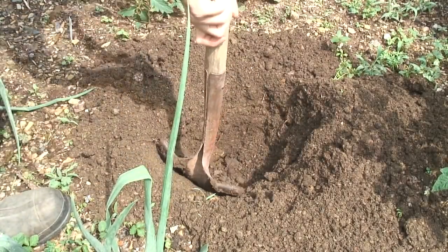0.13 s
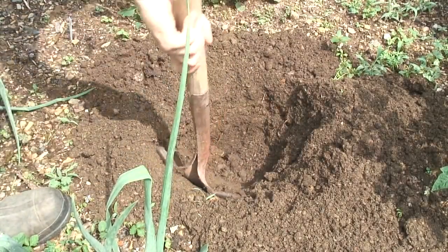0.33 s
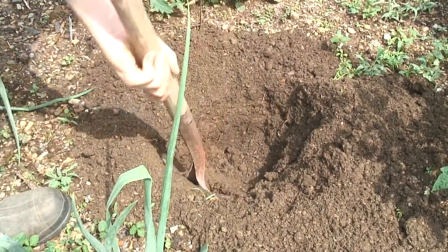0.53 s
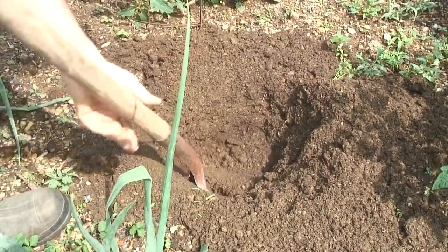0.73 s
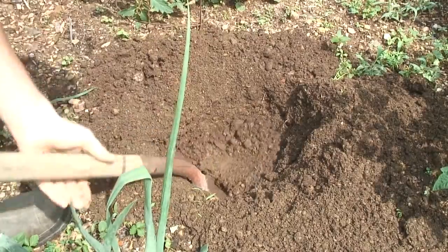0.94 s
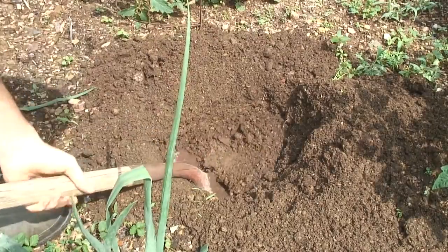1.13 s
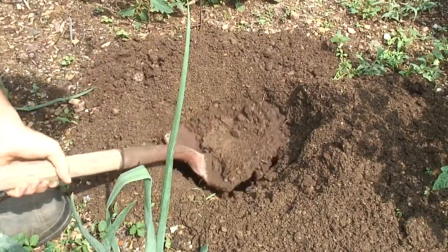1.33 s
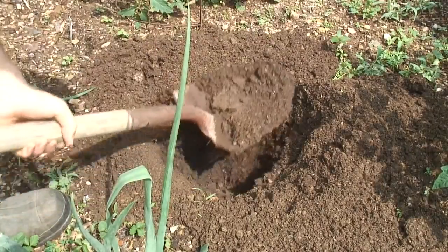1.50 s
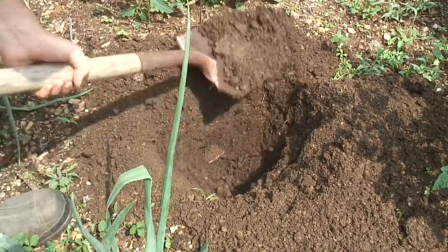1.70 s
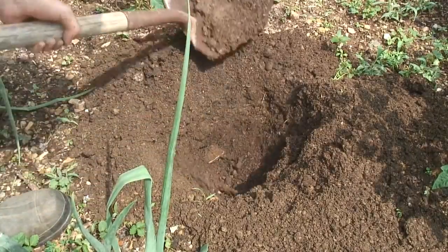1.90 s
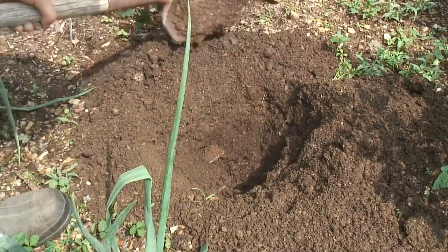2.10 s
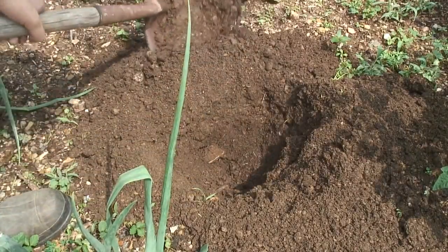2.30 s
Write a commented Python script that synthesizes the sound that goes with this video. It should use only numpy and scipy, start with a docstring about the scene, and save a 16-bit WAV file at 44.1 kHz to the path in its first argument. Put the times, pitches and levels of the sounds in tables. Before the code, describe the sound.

Gritty scraping of a steel shovel pushed through garden earth with stone knocks, then faint birdsong

```python
"""A steel shovel blade is levered through loose, stony garden soil close by, from the very start.
Slipping grains ring the damped blade in stutters, and stones knock it with short taps.
At 0.83 s a low thump comes through the ground; from 0.95 s crumbs trickle off the lifted blade.
From 1.07 s a far bird whistles in wavering gliding tones with an echo.
Under it all lie garden air, made of filtered noise, and the wandering low tones of a far machine."""
import sys
import numpy as np
from scipy import signal
from scipy.fft import rfft, irfft
from scipy.io import wavfile
from scipy.ndimage import uniform_filter1d

SR = 44100
rng = np.random.default_rng(int(sys.argv[2]) if len(sys.argv) > 2 else 0)


def linear_from_db(decibels):
    """Turn decibels (scalar or array-like) into linear amplitude factors; 0 gives 1."""
    return 10 ** (np.asarray(decibels, float) / 20)


def wav_record(signal):
    """Record a signal, one row per channel, as 16-bit PCM in the file named by sys.argv[1]."""
    frames = np.transpose(np.atleast_2d(signal))
    bounded = np.clip(frames, -1, 1)
    # unit amplitude maps onto the largest positive 16-bit level
    quanta = np.round(bounded * 32767).astype(np.int16)
    wavfile.write(sys.argv[1], SR, quanta)


N = 103635  # length in samples


def evened(x):
    """Scales to rms 1."""
    return x / np.sqrt(np.mean(x ** 2) + 1e-20)


def smooth_noise(width):
    """Slowly wandering noise of rms 1: white noise averaged twice over width samples."""
    noise = rng.standard_normal(N)
    return evened(uniform_filter1d(uniform_filter1d(noise, width), width))


def read(points, hz):
    """Reads a spectrum table on a log-frequency axis."""
    f, value = np.transpose(points)
    return np.interp(np.log(hz + 1), np.log(f + 1), value)


def colour(x, points):
    """Filters x to the given spectrum with a causal, minimum-phase filter."""
    gain_db = read(points, abs(np.fft.fftfreq(4096, 1 / SR)))
    log_gain = np.log(linear_from_db(np.maximum(gain_db, -100)))
    taps = np.fft.ifft(np.exp(np.conj(signal.hilbert(log_gain)))).real[:2048]
    return signal.oaconvolve(x, taps)[:len(x)]


def band_filter(x, order, hz, kind):
    """Butterworth filter: low, high or band."""
    return signal.sosfilt(signal.butter(order, hz, kind, fs=SR, output="sos"), x)


def slips(per_s, spread_db, clump_db):
    """Grains that slip: random clicks of either sign, a few large, bunched over some milliseconds."""
    size = linear_from_db(spread_db * np.minimum(rng.exponential(1, N), 4))
    size = size * (rng.random(N) < per_s / SR)
    clumps = smooth_noise(200)
    return evened(size * rng.choice([-1., 1.], N) * linear_from_db(clump_db * clumps))


# The ringing tones of blade and shaft, damped by soil.
# Each row: frequency in Hz, width in Hz (wider dies sooner), relative level in dB.
BLADE_MODES = [(195, 79, -3.5), (314.5, 54, -3.5), (405, 118, -4), (533, 180, -4.5), (610, 84, -5),
               (720, 224, 2.5), (1054, 70, -16.5), (1152, 39, -21), (1588, 52, 3.5), (1696, 166, 8),
               (1996, 206, 10), (2200, 50, -26), (3030, 135, -4), (3237, 150, 6), (3890, 230, 8.5),
               (4790, 174, 1), (5170, 158, -9.5), (5880, 200, -11.5), (6740, 870, 3), (7820, 1100, -1)]


def ring(x, lo, hi):
    """Strikes the modes between lo and hi Hz: decaying sines, scaled together to unit energy."""
    t = np.arange(2000) / SR
    taps = np.zeros(len(t))
    for hz, width, db in BLADE_MODES:
        if lo < hz < hi:
            taps += linear_from_db(db) * np.exp(-np.pi * width * t) * np.sin(2 * np.pi * hz * t)
    return signal.oaconvolve(x, taps / np.linalg.norm(taps))[:len(x)]


# The tone of gritty crunch that does not ring. Each row: frequency in Hz, relative level in dB.
GRIT_TONE = [(120, -28), (200, -7.5), (575, 5.5), (974, -37), (1170, -6), (1330, 2), (3180, -1.5),
             (8820, -15), (10800, -22), (15500, -60.5)]


def crunch(x):
    """Colours clicks as grit; the filter is scaled to unit energy."""
    single_click = np.eye(1, 2048)[0]
    return colour(x, GRIT_TONE) / np.linalg.norm(colour(single_click, GRIT_TONE))


# The blade dragging through soil, written as several lists of rows that join into one curve. # Each row: time
# in seconds, push in dB, then levels in dB relative to that push: # soil thud, shaft, low blade tones, grit
# hiss.
DRAG_SPANS = [
    [(0.0, -60.5, 25.5, -3, 13, 10.5), (0.028, -59, 17, 1, 8, 13.5), (0.036, -44.5, 13, -16, -1, 2),
     (0.046, -59, 21, 5, 4, 13), (0.052, -44, 10.5, -13, -4, 2.5), (0.072, -52, 17, 14, 2, 7),
     (0.08, -43, 5, 6, 8.5, 1), (0.104, -45.5, 10, 1, 2, 2.5), (0.152, -58.5, 12, 7, -2, 1),
     (0.176, -46, -3, -9, 3.5, 1.5), (0.202, -55.5, 17, 4, 5, 7.5), (0.22, -58.5, 14, 7, -5, 12)],
    [(0.222, -46.5, 13, 11.6, 15.3, 0), (0.25, -41, 1, 12, 8.1, -0.5), (0.268, -37.5, 10, 10.6, 1, -4),
     (0.272, -43, 17.5, 11, 8, 4.5), (0.298, -33.5, -2.5, 8.2, 3, -1), (0.31, -36.5, 10, 7.4, 13, 3)],
    [(0.312, -29, 0, 8, 8.5, 0), (0.316, -32, -4, 3.5, 5, 1.5), (0.346, -26.5, -14, 4, 10.5, -0.5),
     (0.368, -39, -17, -7, 6, 7.5), (0.38, -43, -26, -9, -25, 8.5), (0.4, -36.5, -12, -12, -9, 4.5),
     (0.412, -32, -7, -4, -5, 2.5)],
    [(0.414, -32.5, -6, -8, 0.5, -0.5), (0.438, -33, -1, -1.5, 5, 6), (0.47, -27, -16, -8.5, -9.5, -3),
     (0.504, -39, -20, -20, -23, 2.5), (0.524, -40.5, -8, -13, -14, -3), (0.53, -30, -12, -15, -17, 0)],
    [(0.532, -34, -2, -15, -23, -3), (0.542, -23, -17, -17, -35, -23), (0.55, -38, -14, -25, -16, 4),
     (0.56, -33, 2, -1, -21, -2.5), (0.574, -28.5, -10, -6, -12, -7), (0.588, -41.5, -6, -2, -9, 7),
     (0.598, -36.5, -14, -21, -23, -5), (0.61, -36.5, -15, -3.5, -19, 3.5), (0.658, -36, 8, -6, -20, 6),
     (0.664, -26.5, -9, -6, -12, -7), (0.684, -53.5, 0, -7, -8.5, 8.5), (0.7, -48, -1, 2, -12, 2)],
    [(.705, -50, 15, -3, -6, 5), (.731, -53, -1, -4, 3, 3), (.733, -18.5, -14, -14, -20, -11),
     (.737, -41, 14, -7, -15, -2), (.748, -53, 14, 9, -10, 6), (.752, -31, 9.5, -4, -26, -0.5),
     (.772, -42, 4, -14, -22, 1.5), (.776, -51, 10, -2, -9, 6), (.797, -51, 11, 3, -13, -0.5)],
    [(.799, -42, 5, -1, -10, -8), (.804, -44, 13, -5, -9, -16), (.807, -44, 8, -11, 0, -3),
     (.809, -25.5, -12, -1.5, -13, 0), (.816, -29, -17, -10, -18, -2), (.820, -31, 9, -4, -10, -2),
     (.823, -16.5, -4, -11, -10, -11), (.830, -10.5, 0.5, -8, -22, -7), (.843, -11, -38, -30, -16, -4),
     (.845, -30, 2, -3, -21, -16), (.848, -17, -15, -14, -20, -3), (.855, -10, -10, -26, -21, -16.5),
     (.857, -26.5, -4, 14, -18, -12), (.862, -26.5, -2, 2, -12, -9), (.864, -6.5, -11.5, -21, -10, -14),
     (.874, -12, -19, -30, -37, -25), (.876, -19, 0, -2.5, -25, -5), (.889, -25.5, -8, 5.5, -27, -2.5),
     (.893, -40, 6, -6, -6, -6.5), (.95, -51, -8, -2, -5, 1)],
]


def drag():
    """Coarse grains slip on the steel and ring its modes; fine grit hisses on top."""
    rows = np.concatenate(DRAG_SPANS)
    t = np.arange(N) / SR
    level, thud, shaft, low, hiss = (np.interp(t, rows[:, 0], column) for column in rows.T[1:])
    push = linear_from_db(level) * (np.arange(N) < rows[-1, 0] * SR)
    force = slips(per_s=1800, spread_db=4.5, clump_db=2.0) * push
    grit = slips(per_s=6300, spread_db=3, clump_db=1.9) * push
    fine = (grit + .5 * force) * linear_from_db(hiss)

    out = ring(force * linear_from_db(thud), 0, 480)
    out += ring(force * linear_from_db(shaft), 480, 800)
    out += ring(force * linear_from_db(low), 800, 1300)
    out += ring(force, 1300, 2700)
    out += linear_from_db(-3) * ring(fine, 2700, SR)
    out += linear_from_db(4) * band_filter(crunch(force), 2, [1200, 2800], "band")
    out += linear_from_db(2.5) * band_filter(crunch(fine), 2, 4200, "high")
    return out


# Stones knocking the blade.
# Each row: start in seconds, strength in dB, dB added to that for the thud; gains follow below.
STONE_KNOCKS = [(0.0347, -28.5, -8), (0.0521, -34.5, 1), (0.1086, -15.5, -11.5), (0.1278, -30, -1),
                (0.171, -24.5, 0.5), (0.1889, -19.5, -3.5), (0.2193, -28, 2), (0.2283, -25.5, 6.5),
                (0.2458, -16, 3), (0.2739, -16, -11), (0.419, -11.5, -25), (0.4704, -12, -32),
                (0.5397, -14.5, -26), (0.5742, -13.5, -16.5), (0.6604, -9.5, -18.5), (0.7334, -18, -15),
                (0.7535, -20, -2.5), (0.7694, -29.5, 5.5), (0.8019, -6, -9), (0.829, -5.5, -19.5),
                (0.8359, 0.5, -13), (0.8487, -4, -17), (0.8634, -3, -18.5), (1.9829, -34, -14),
                (2.3096, -34, -12.5)]


def knocks():
    """Each stone is a short noise burst that cracks and rings the blade, with a dull thud."""
    hit, thud = np.zeros(N + 300), np.zeros(N + 300)
    fade = np.exp(-np.arange(200) / SR / 0.0011)  # falls to 1/e in 1.1 ms
    for start, db, thud_db in STONE_KNOCKS:
        tap = rng.standard_normal(200) * fade
        at = round(start * SR)
        hit[at:at + 200] += linear_from_db(db + 5.5) * tap / np.linalg.norm(tap)
        thud[at:at + 60] += linear_from_db(db + thud_db) * np.hanning(60)
    blade = linear_from_db(-3) * ring(hit, 800, SR)
    crack = linear_from_db(-2) * crunch(hit)
    dull = linear_from_db(-6.5) * ring(thud, 0, 800)
    return (blade + crack + dull)[:N]


# Crumbs sliding off the lifted blade; gains follow below.
# Each row: time in seconds, trickle level in dB, clods in dB relative to the trickle.
TRICKLE_LEVEL = [(.95, -52, 3.5), (1.0, -48.5, 2), (1.065, -48, -1), (1.081, -40.5, 3.5), (1.124, -43, 5),
                 (1.14, -55, 5), (1.16, -63, 2), (1.3, -64, 6), (1.42, -53.5, -2), (1.52, -53, 3),
                 (1.59, -48.5, -1), (1.66, -54, -1), (1.76, -66, 4), (1.98, -61, -2), (1.981, -48, 2),
                 (1.987, -59, 4), (1.992, -63, 0.5), (2.21, -69, 3), (2.25, -60, 1.5), (2.295, -55, 3.5),
                 (2.308, -46.5, 1), (2.322, -54.5, 0.5), (2.35, -58, 0)]
# The tone of falling crumbs. Each row: frequency in Hz, relative level in dB.
CRUMB_TONE = [(180, -29), (300, -11), (1230, -8), (1540, -2.5), (1850, -2.5), (2320, 7.5), (3490, -6.5),
              (6840, -16), (13600, -32), (15000, -50)]


def trickle():
    """Random clicks patter off the blade: fine crumbs above 3000 Hz, clods below."""
    s, db, clod_db = np.transpose(TRICKLE_LEVEL)
    t = np.arange(N) / SR
    crumbs = colour(slips(per_s=6000, spread_db=2.8, clump_db=0.59), CRUMB_TONE)
    fine = evened(band_filter(crumbs, 2, 3000, "high"))
    clods = evened(band_filter(crumbs, 2, 3000, "low"))
    clods *= linear_from_db(np.interp(t, s, clod_db))
    level = linear_from_db(np.interp(t, s, db, left=-120))  # practically silent before the lift
    return level * (1.84 * fine + 1.54 * clods)


def shovel():
    """All that the blade does; it is too small to radiate bass."""
    return band_filter(drag() + knocks() + trickle(), 4, [227, 13400], "band")


# How far the two sides differ. Each row: frequency in Hz, side level minus mid level in dB.
SHOVEL_SIDE = [(100, -23), (300, -16.5), (700, -21.5), (1400, -25.5), (2400, -22.5), (3500, -8), (5000, -4),
               (8000, -4.5), (12000, 0.5)]


def ports(x, other):
    """Two close microphone ports: alike in the bass; in the treble phase and grains differ."""
    shifted_share = .55  # power share of the side that is the same sound, a quarter cycle shifted
    side = 1j * np.sqrt(shifted_share) * rfft(x) + np.sqrt(1 - shifted_share) * rfft(other)
    side = irfft(side * linear_from_db(read(SHOVEL_SIDE, np.fft.rfftfreq(N, 1 / SR))), N)
    return np.array([x + side, x - side])


def thump():
    """The ground jolts as a buried stone gives way: one decaying low sine, stronger on the left."""
    start_s, level_db, hz, t60_s = .834, -21.46, 59.7, 0.11
    t = np.maximum(np.arange(N) / SR - start_s, 0)
    port_db = np.array([[2.5], [-2.5]])  # left, right
    return linear_from_db(level_db + port_db - 60 * t / t60_s) * np.sin(2 * np.pi * hz * t)


# The bird's notes, one list of rows for each gliding whistle.
# Each row: time in seconds, pitch in Hz, level in dB before the flutter and gain below.
BIRD_NOTES = [
    [(1.07, 2950, -49), (1.11, 2834, -48), (1.14, 3100, -55), (1.15, 2900, -52), (1.19, 2770, -65)],
    [(1.15, 2640, -48), (1.17, 2280, -52), (1.19, 2200, -61)],
    [(1.2, 2900, -52), (1.25, 2635, -48.5), (1.3, 2510, -65), (1.34, 2600, -60)],
    [(1.41, 4770, -56), (1.43, 4970, -59)],
    [(1.63, 2378, -53), (1.66, 2300, -57), (1.68, 3100, -48.5), (1.7, 3450, -55), (1.72, 3493, -48),
     (1.726, 2876, -46), (1.733, 2403, -55), (1.76, 2293, -57), (1.8, 2135, -57)],
    [(1.73, 3450, -64), (1.8, 3400, -65), (1.9, 3450, -63), (1.97, 3450, -72)],
    [(1.82, 2234, -53), (1.87, 2315, -56), (1.89, 2116, -48), (1.91, 2100, -65)],
    [(1.85, 2830, -58), (1.9, 3050, -56), (1.94, 2825, -54)],
]


def bird():
    """Gliding sines with wavering pitch and fluttering level, echoing off the garden walls."""
    flutter_db, echo_db, echo_t60_s = 2.5, 0.5, 0.84
    t, song = np.arange(N) / SR, np.zeros(N)
    waver = evened(uniform_filter1d(rng.standard_normal(N), 300))
    for note in BIRD_NOTES:
        s, hz, db = np.transpose(note)
        edge = np.clip(np.minimum(t - s[0], s[-1] - t) / 0.0021, 0, 1)  # fades of 2.1 ms
        pitch = np.interp(t, s, hz) * (1 + .016 * waver)
        song += edge * linear_from_db(np.interp(t, s, db)) * np.sin(2 * np.pi * np.cumsum(pitch) / SR)
    song *= linear_from_db(flutter_db * smooth_noise(250) - 1)
    # the echo is decaying noise, different at each port
    tail = rng.standard_normal((2, SR)) * linear_from_db(-60 * t[:SR] / echo_t60_s)
    tail /= np.linalg.norm(tail[0])
    echo = signal.fftconvolve(song[None], tail, axes=1)[:, :N]
    return np.sqrt(2) * (song + linear_from_db(echo_db) * echo)


# The level of the main hum tone. Each row: time in seconds, rms level in dB.
MAIN_HUM_LEVEL = [(0.0, -58), (0.06, -49.5), (0.67, -58), (1.15, -46), (1.41, -69), (1.49, -58),
                  (1.58, -66), (1.67, -49.5), (2.19, -52), (2.26, -67), (2.31, -51), (2.35, -51)]
# The weaker hum tones. Each row: pitch in Hz, rms level in dB, pitch wander in Hz rms.
WEAK_HUMS = [(193.5, -60, 4.75), (59.6, -60.5, 6.8)]


def hum():
    """Low tones of a far machine, wandering in pitch; the main one swells and fades."""
    t, out = np.arange(N) / SR, np.zeros(N)
    main = (121, np.interp(t, *np.transpose(MAIN_HUM_LEVEL)), 1.94)
    for hz, db, width in [main] + WEAK_HUMS:
        wander = evened(uniform_filter1d(rng.standard_normal(N), 4000)) * width
        cycles = hz * t + np.cumsum(wander) / SR
        out += linear_from_db(db) * np.sqrt(2) * np.sin(2 * np.pi * cycles)
    return out


# The tone of the garden air. Each row: frequency in Hz, relative level in dB per Hz.
AIR_TONE = [(15, -42), (25, -11.5), (126, -9.5), (204, -14.5), (221, -13.5), (281, -15), (762, -25.5),
            (871, -23), (1380, -28), (2170, -27), (10100, -36.5), (15500, -55)]
# How alike the air is at the two ports. Each row: frequency in Hz, likeness (1 is the same).
AIR_LIKENESS = [(60, 0.76), (130, 0.66), (290, 0.16), (640, 0.048), (1410, 0.6), (3100, 0.36),
                (6820, -0.18), (15000, 0.11)]


def air():
    """Distant outdoor wash: noise shaped in short overlapping frames, with faint drifting patches."""
    level_db, patch_db = -46.5, 1.0  # both rms
    frames, hz = N // 512 + 5, np.fft.rfftfreq(2048, 1 / SR)
    a, b, c, d, patches = rng.standard_normal((frames, 1025, 5)).T
    patches = evened(uniform_filter1d(uniform_filter1d(patches, 30, 0), 8, 1))
    same = np.clip(read(AIR_LIKENESS, hz), -1, 1)[:, None]
    mid = np.sqrt(1 + same) * (a + 1j * b)
    side = np.sqrt(1 - same) * (c + 1j * d)
    gain = linear_from_db(read(AIR_TONE, hz)[:, None] + patch_db * patches)
    spectrum = np.array([mid + side, mid - side]) * gain
    wash = signal.istft(spectrum, nperseg=2048, noverlap=1536)[1][:, :N]
    return linear_from_db(level_db) * evened(wash)


def scene():
    """All sources at the two ports."""
    return ports(shovel(), shovel()) + thump() + bird() + hum() + air()


def roll_off(x):
    """The treble ends steeply here."""
    return signal.sosfilt(signal.butter(12, 15700, fs=SR, output="sos"), x)


def record(dry):
    """The converter clips the highest peaks, then the treble rolls off above 14200 Hz."""
    clipped = np.clip(dry, -.94, .94)
    mix = band_filter(clipped, 8, 14200, "low")
    return roll_off(mix)


dry = scene()
out = record(dry)
wav_record(out)
```